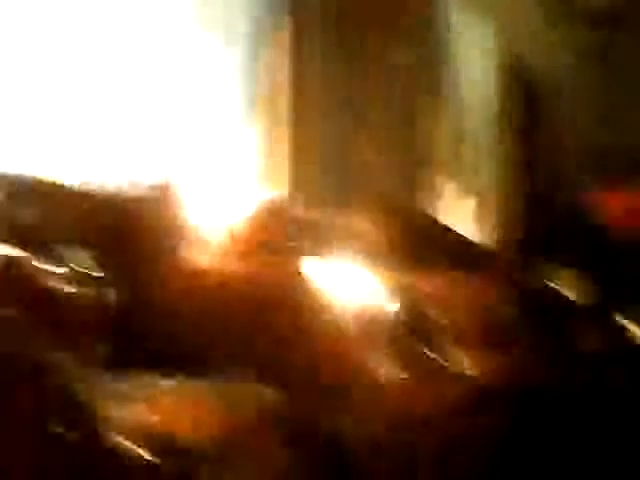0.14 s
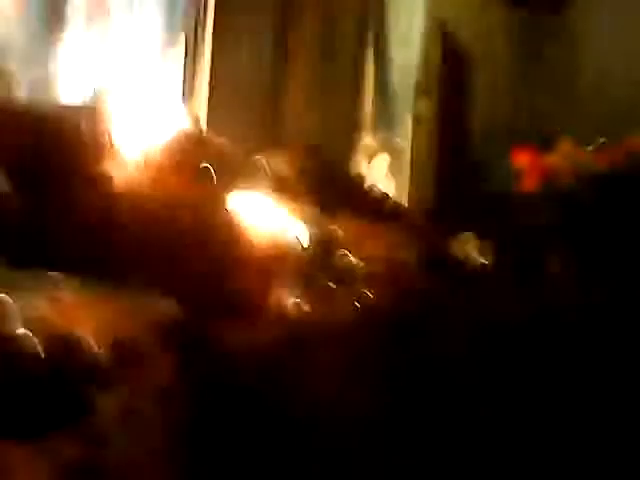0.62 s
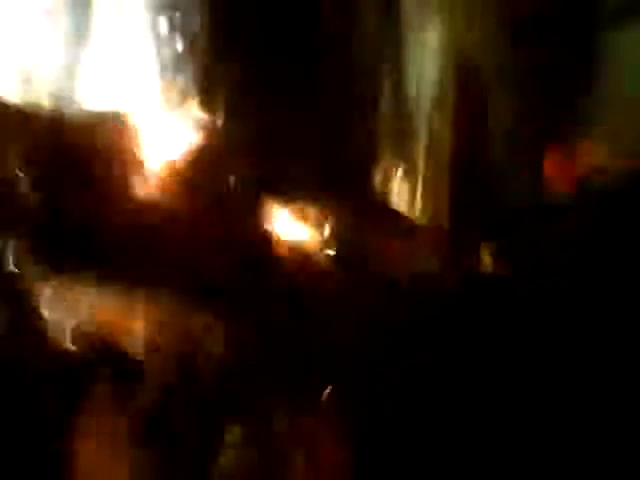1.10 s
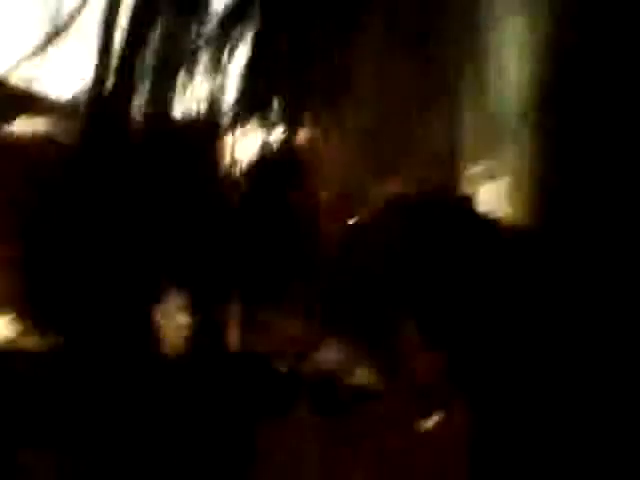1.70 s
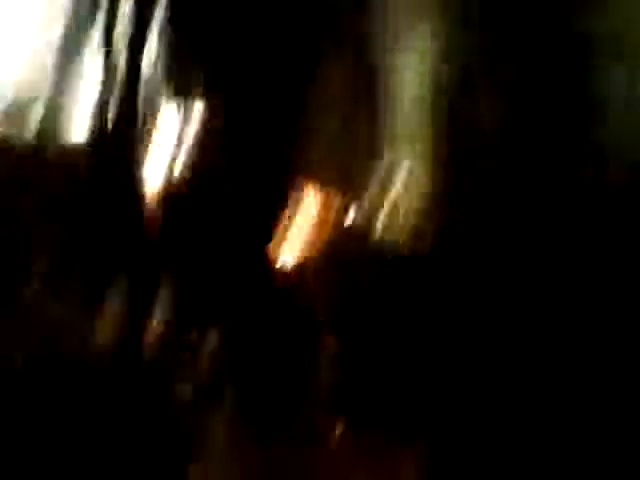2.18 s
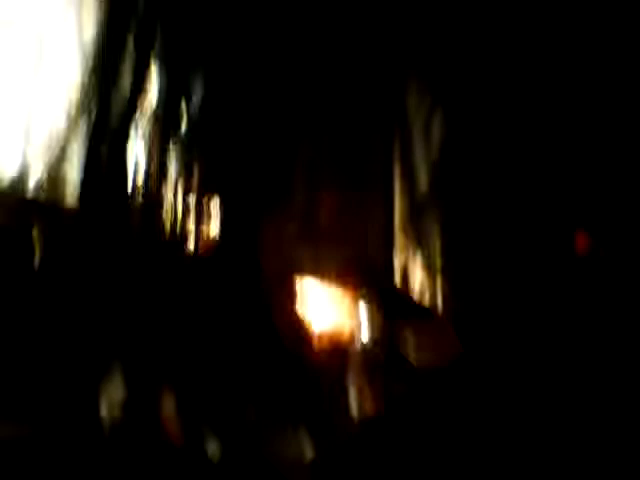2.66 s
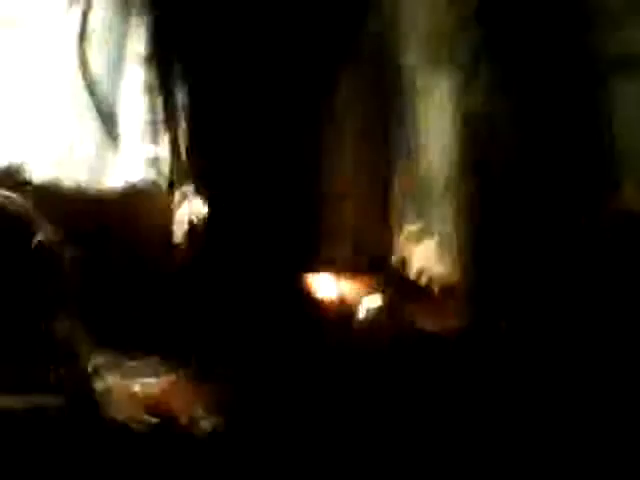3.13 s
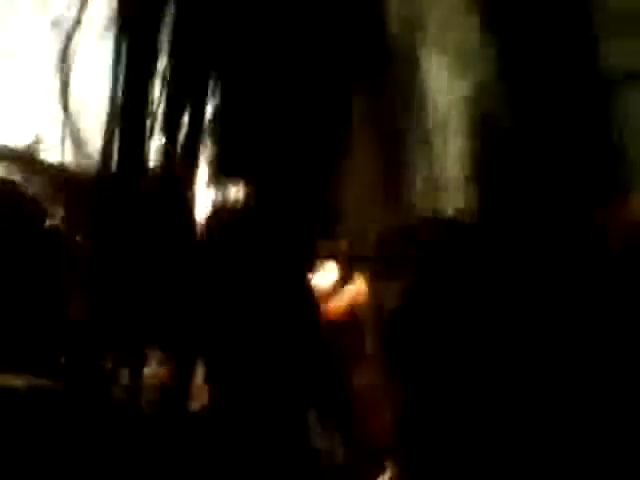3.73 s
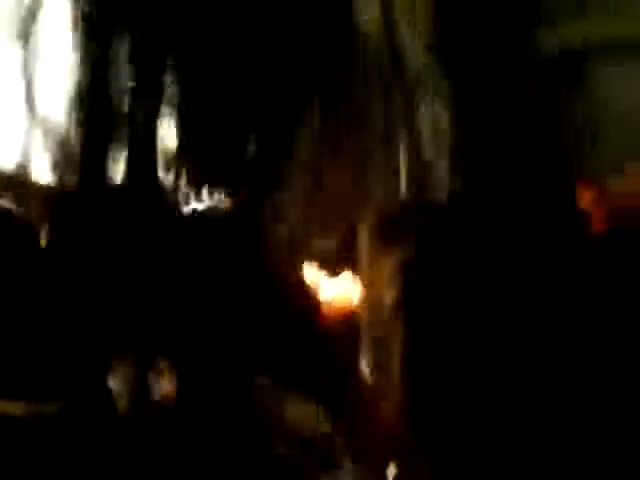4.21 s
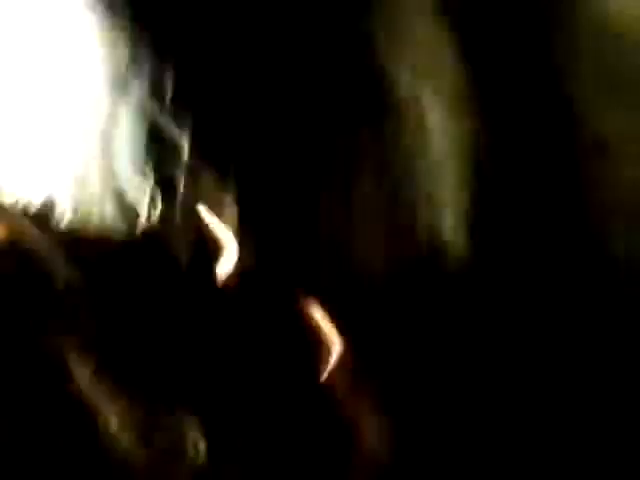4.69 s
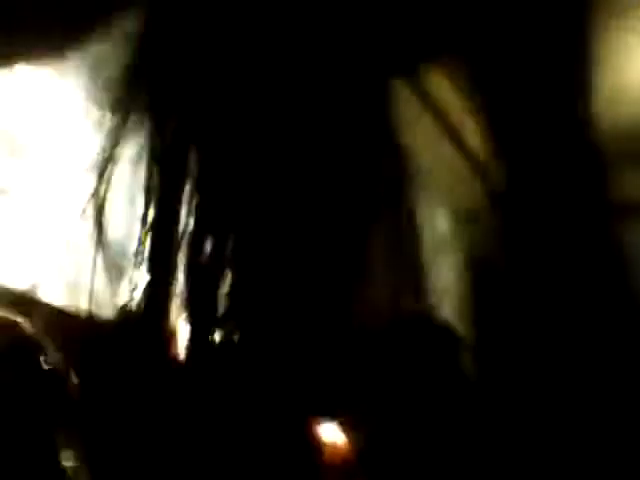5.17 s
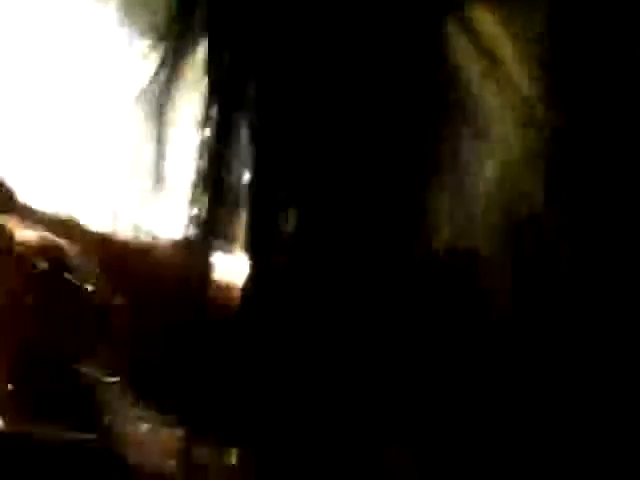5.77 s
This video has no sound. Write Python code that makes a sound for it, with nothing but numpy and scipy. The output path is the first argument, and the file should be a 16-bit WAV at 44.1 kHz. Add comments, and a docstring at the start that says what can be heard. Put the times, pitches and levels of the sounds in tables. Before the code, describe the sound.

Very close, dry, mono sound of dogs scuffling indoors, without barking or growling. Dull low thumps come in uneven clusters, with bright hard taps and brushing strokes of fur and pads. The action is busiest from about two to three and a half seconds, eases, then continues as rubbing and bumps, ending with a hard knock and thuds. Faint hiss and low handling-like rumble lie beneath.

```python
"""Two dogs wrestle right next to a small hand-held recorder indoors, for just under six seconds.
From the start, paws and bodies thud (damped low rings), claws and teeth tap (short bright rings) and
fur and pads rub (noise through resonances), over a jostling rumble (lumpy low noise) and steady hiss.
Five hollow pops (one struck cavity) come at 1.5 to 1.8 s, then a nose puffs (narrow noise) from 2.8 to
3.0 s, around the heaviest thuds; the wrestling goes on to the end."""
import sys
import numpy as np
from scipy import signal
from scipy.fft import rfft, irfft
from scipy.io import wavfile
from scipy.ndimage import uniform_filter1d

SR = 44100
rng = np.random.default_rng(int(sys.argv[2]) if len(sys.argv) > 2 else 0)


def generate_wav(sig):
    """Save sig (samples, or channels by samples) to the path in sys.argv[1] as 16-bit PCM at SR."""
    pcm = np.round(np.clip(np.atleast_2d(sig).T, -1, 1) * 32767).astype(np.int16)
    wavfile.write(sys.argv[1], SR, pcm)


def invert_db(x):
    """Field ratio 10**(x/20) for x, a level in decibels (scalar or array-like)."""
    u = np.asarray(x, float) / 20
    return 10 ** u


N = 258426  # length in samples
TIME_S = np.arange(N) / SR


def level(x, db):
    """Scale to an rms level."""
    return x * invert_db(db) / np.sqrt(np.mean(x ** 2))


def band(x, hz, width_hz):
    """Two-pole resonance, gain 1 at the centre."""
    return signal.lfilter(*signal.iirpeak(hz, hz / width_hz, fs=SR), x)


def ring(x, hz, t60_s):
    """A mode struck by x, dying away by 60 dB in t60_s."""
    pole = np.exp(2j * np.pi * hz / SR - np.log(1000) / (t60_s * SR))
    return signal.lfilter([1], [1, -pole], x).imag


def walk(rate_hz):
    """Smooth random wandering: levels held for 1 / rate_hz, then smoothed twice; spread near 0.75."""
    hold = int(SR / rate_hz)
    steps = np.repeat(rng.standard_normal(N // hold + 1), hold)
    return 1.01 * uniform_filter1d(uniform_filter1d(steps, hold), hold)[:N]


def add(out, start_s, sound, peak_db):
    """Place a sound at a start time with a given peak."""
    i = int(start_s * SR)
    out[i:i + len(sound)] += (invert_db(peak_db) * sound / np.abs(sound).max())[:N - i]


# paws and bodies landing: start_s, peak_db, pitch_hz
THUDS = [(0.024, -21.5, 214), (0.037, -17, 206), (0.137, -28, 164), (0.196, -23.5, 270), (0.212, -27, 186),
         (0.251, -32, 146), (0.309, -34, 170), (0.52, -30, 190), (0.557, -33, 146), (0.675, -32, 210),
         (0.895, -27, 147), (0.916, -25.5, 177), (0.972, -32, 121), (1.158, -24.5, 170), (1.175, -16, 192),
         (1.287, -20, 141), (1.328, -31, 146), (1.371, -22.5, 163), (1.456, -23, 255), (1.514, -32, 136),
         (1.626, -24, 162), (1.707, -31.5, 129), (1.771, -21.5, 280), (2.003, -22, 179), (2.14, -14.5, 203),
         (2.176, -20.5, 410), (2.235, -29, 210), (2.268, -21.5, 200), (2.291, -22, 205), (2.57, -31, 145),
         (2.679, -28.5, 178), (2.778, -25, 247), (2.804, -24.5, 150), (2.821, -27, 246), (2.873, -24, 158),
         (2.901, -20, 164), (2.915, -11, 215), (2.93, -18.5, 245), (2.942, -24, 291), (2.963, -26, 232),
         (2.977, -18, 346), (2.991, -11, 216), (3.276, -17, 230), (3.32, -26, 151), (3.339, -22.5, 146),
         (3.368, -12.5, 183), (3.523, -32.5, 144), (3.706, -26.5, 135), (3.811, -20.5, 138),
         (3.857, -31.5, 162), (4.016, -31, 141), (4.106, -21, 184), (4.178, -26.5, 211), (4.304, -40, 223),
         (4.411, -23.5, 218), (4.449, -27.5, 144), (4.535, -28.5, 186), (4.555, -25, 220),
         (4.576, -20.5, 179), (4.629, -28, 214), (4.736, -27.5, 117), (4.833, -29.5, 115),
         (4.964, -29.5, 156), (4.991, -28, 193), (5.05, -33.5, 121), (5.094, -31, 183), (5.153, -35, 136),
         (5.247, -28, 183), (5.658, -29.5, 195), (5.709, -39, 222), (5.733, -14.5, 140), (5.763, -26, 220),
         (5.795, -16.5, 186)]


def thuds(push_cycles=0.31, overtone_db=-12, overtone_ratio=2.1, ring_cycles=5.3):
    """A soft push, a part of a cycle long, sets off a heavily damped low ring and a weaker overtone."""
    out = np.zeros(N)
    for start_s, peak_db, pitch_hz in THUDS:
        t60_s = ring_cycles / pitch_hz
        push = np.zeros(SR // 8)
        length = max(int(push_cycles * SR / pitch_hz), 4)
        push[:length] = np.hanning(length)
        main = ring(push, pitch_hz, t60_s)
        overtone = ring(push, overtone_ratio * pitch_hz, t60_s / 2)
        add(out, start_s, main + invert_db(overtone_db) * overtone, peak_db)
    return out


# hard taps: start_s, peak_db of the middle modes, then relative to that peak:
# low_db (weight behind the tap), treble_db (hardness)
TAPS = [(0.0253, -37, 6, -20), (0.0339, -36, 11.5, -23), (0.1965, -16.5, -3.5, -38),
        (0.2132, -38.5, 2, -20), (0.521, -46.5, 2, -24), (0.9041, -30, -3.5, -31), (1.0078, -43, -25, 5.5),
        (1.1726, -37, 18.5, -19), (1.1982, -38.5, 6, -23), (1.2864, -28.5, -2, -14), (1.368, -44, 10, -11),
        (1.4427, -26, 5, -31), (1.4581, -31.5, 7.5, -37), (1.7732, -32, 9.5, -16), (1.8217, -32.5, -2, -9),
        (2.0023, -54, 14, -15), (2.0263, -37, -19, -18), (2.0585, -50, -12, 8), (2.0695, -54, -12, 7),
        (2.0925, -37.5, -3, -8), (2.1418, -30.5, 8, -34), (2.1711, -11.5, -4.5, -5.5),
        (2.2327, -42, 10, -25), (2.3078, -14, -1, -20), (2.3192, -31, -5, -4), (2.3982, -39, 10.5, -27),
        (2.4768, -39, 0, -21), (2.7392, -42, -9, 0), (2.746, -31, 3, 2), (2.7532, -22, -21, 7.5),
        (2.7773, -1, -4, 5.5), (2.8032, -38.5, -1, -19), (2.8687, -39, 4, -20), (2.9133, -36, 6, -21),
        (2.9931, -25.5, 12.5, -28), (3.279, -13.5, -3.5, 3), (3.3575, -33, 0, -8), (3.3686, -38, 11.5, -19),
        (3.5234, -45.5, 5, -19), (3.7024, -43, -12, 4.5), (3.7128, -41, 4.5, -6), (3.7526, -37.5, -16, -11),
        (3.8082, -38.5, 0, -19), (3.8552, -37.5, -7, 2.5), (4.0044, -49, -15, -15),
        (4.1063, -40.5, 15.5, -25), (4.1768, -28.5, 0, -43), (4.1822, -29.5, 2.5, -47),
        (4.3019, -46.5, 12, -31), (4.4118, -41.5, 2.5, -20), (4.4177, -35.5, 10, -33),
        (4.4308, -22, -5, -4.5), (4.5759, -25, -5, -9), (4.5963, -17, 0, -19), (4.6277, -31, -3, -22),
        (4.8094, -26.5, -16, 2.5), (4.9315, -36, 3, -31), (5.0049, -39, 9, -28), (5.0491, -53, 7, -20),
        (5.1498, -43.5, 12.5, -18), (5.4212, -39, 2, -12), (5.6131, -37.5, 5, -21),
        (5.7103, -9, -18.5, -7.5), (5.7335, -22, -1, -36), (5.7628, -40, 14, -30),
        (5.7945, -26.5, -0.5, -36)]
# what a tap rings with, in low, middle, upper middle and treble groups:
# pitch_hz (shifted a little at each tap), t60_s, strength_db (within its group)
MODES = [
    [(461, 0.05, -1.5), (585, 0.0087, 2.5), (764, 0.031, -1), (877, 0.0098, 1)],
    [(1383, 0.0086, 9), (1670, 0.0076, -4)],
    [(2170, 0.0059, -2.5), (2680, 0.0053, 3.5), (3065, 0.012, -6), (3494, 0.0043, 1)],
    [(4980, 0.0018, 13.5), (6130, 0.003, -5), (7510, 0.0018, -18.5), (9730, 0.0045, 3.5),
     (11880, 0.0088, -15.5), (14700, .003, -17)],
]
# how long the contact lasts as felt by each group, before three samples are added: push_s
GROUP_PUSHES = (0.00049, 0.00058, 0, 0)


def taps(rattle_db=-11, rattle_t60_s=0.0057):
    """A sharp contact and a short dying rattle strike the modes, a little differently at each spot."""
    out = np.zeros(N)
    t = np.arange(SR // 10) / SR
    for start_s, peak_db, low_db, treble_db in TAPS:
        upper_db = 2.5 + 0.2 * treble_db  # the upper middle rises a little with hardness
        contact = invert_db(rattle_db - 60 * t / rattle_t60_s) * rng.standard_normal(len(t))
        contact[0] += 1
        spot = 1 + 0.025 * rng.standard_normal((4, 6))  # pitch shift of each mode
        group_db = (low_db, 0, upper_db, treble_db)
        for modes, part_db, push_s, shifts in zip(MODES, group_db, GROUP_PUSHES, spot):
            push = np.convolve(contact, np.hanning(int(push_s * SR) + 3))[:len(t)]
            # all modes start the same way, which gives the sharp first spike
            sound = 0
            for (hz, t60_s, strength_db), shift in zip(modes, shifts):
                gain = invert_db(strength_db + airy(hz, treble_db))
                sound = sound + gain * ring(push, hz * shift, t60_s)
            add(out, start_s, sound, peak_db + part_db)
    return out


def airy(hz, treble_db, per_octave=0.27):
    """Tilt in dB above the lowest treble mode: soft taps lose their very top, the hardest gain there."""
    octaves_up = np.log2(hz / MODES[-1][0][0])
    return per_octave * treble_db * max(octaves_up, 0)


# resonances of the rubbed surface, three groups: pitch_hz, width_hz, strength_db (within its group)
SCRAPE_RUB = [(2430, 1580, 22.5), (2920, 340, 14), (3820, 700, -19.5)]
DULL_RUB = [(750, 370, -10), (940, 650, 8.5), (1409, 530, 5), (1720, 610, 1.5)]
BRIGHT_RUB = [(4710, 2400, -2), (5740, 600, -10.5), (8240, 1010, 3), (9490, 2400, 3), (11940, 3000, -14.5),
              (14300, 2500, -16.5)]


def rubbing():
    """Dense slips of hair and pad, uneven in size, sound through resonances whose strengths flutter."""
    slips = rng.standard_normal(N) * invert_db(1.8 * walk(900) + 1.6 * walk(150))
    out = 0
    for peaks, gain in zip((SCRAPE_RUB, DULL_RUB, BRIGHT_RUB), stroke_levels()):
        part = 0
        for hz, width_hz, strength_db in peaks:
            flutter = invert_db(strength_db + 2.6 * walk(24.89))
            part = part + flutter * band(band(slips, hz, width_hz), hz, 3 * width_hz)
        out = out + gain * level(part, 0)
    return out


# rubbing strokes: hardest_s, swell_s, ease_s, dull_db (level of the dull part at the hardest moment),
# dryness_db (scrape above the dull part)
RUBS = [(0.028, 0.008, 0.022, -51, -19), (0.1, 0.029, 0.033, -47.5, -9), (0.44, 0.057, 0.038, -50.5, -5.5),
        (0.525, 0.023, 0.063, -57, -17), (0.61, 0.072, 0.08, -49.5, -7), (0.69, 0.058, 0.06, -55.5, -10),
        (0.8, 0.11, 0.048, -61.5, -9), (0.95, 0.029, 0.037, -50, -11), (1.02, 0.072, 0.088, -51.5, -6.5),
        (1.14, 0.034, 0.035, -61, 8), (1.21, 0.069, 0.067, -49, -15), (1.29, 0.039, 0.033, -49, -3),
        (1.38, 0.073, 0.12, -46, -7), (1.46, 0.04, 0.14, -54.5, 5.5), (1.578, 0.021, 0.091, -50, -8),
        (1.73, 0.086, 0.12, -54, -2.5), (1.82, 0.023, 0.035, -48, -9), (1.87, 0.023, 0.021, -58.5, -16),
        (2.01, 0.016, 0.042, -60, -11), (2.09, 0.05, 0.033, -48.5, -8.5), (2.142, 0.011, 0.011, -44.5, -21),
        (2.2, 0.016, 0.092, -57, -6), (2.28, 0.053, 0.079, -40.5, -8.5), (2.39, 0.1, 0.071, -54, -12),
        (2.48, 0.061, 0.11, -75, 11), (2.569, 0.057, 0.066, -44, 5), (2.648, 0.057, 0.057, -44, 3),
        (2.751, 0.017, 0.02, -40, -7), (2.85, 0.041, 0.15, -52.5, -6.5), (2.95, 0.08, 0.07, -47, -12),
        (3.05, 0.072, 0.084, -72.5, 7), (3.135, 0.037, 0.035, -66, 4), (3.238, 0.042, 0.07, -56.5, -4.5),
        (3.28, 0.029, 0.011, -33, 4), (3.296, 0.018, 0.02, -44.5, -4.5), (3.37, 0.023, 0.028, -51, 1.5),
        (3.473, 0.082, 0.038, -55.5, -2.5), (3.53, 0.013, 0.013, -65, 10), (3.715, 0.037, 0.028, -55.5, 0),
        (3.76, 0.027, 0.042, -47.5, 1.5), (3.82, 0.028, 0.089, -53.5, 1), (3.87, 0.043, 0.072, -52, 2.5),
        (3.96, 0.064, 0.056, -60, 2), (4.02, 0.069, 0.057, -49.5, -0.5), (4.054, 0.032, 0.047, -50.5, -2.5),
        (4.114, 0.015, 0.077, -59.5, -15), (4.187, 0.02, 0.027, -45.5, -27),
        (4.32, 0.026, 0.058, -60.5, -10), (4.375, 0.027, 0.037, -63, 3.5), (4.451, 0.057, 0.047, -45, -5.5),
        (4.53, 0.1, 0.066, -49, -11), (4.61, 0.081, 0.12, -44, -8), (4.741, 0.067, 0.067, -43, -10),
        (4.81, 0.014, 0.048, -51.5, -14), (4.885, 0.051, 0.063, -52.5, -7), (4.973, 0.039, 0.03, -48, -3),
        (5.06, 0.015, 0.023, -51, -8.5), (5.161, 0.064, 0.064, -46, -11), (5.25, 0.085, 0.072, -44.5, -4),
        (5.34, 0.073, 0.087, -49, -8.5), (5.434, 0.029, 0.071, -40, -11.5), (5.53, 0.12, 0.067, -47, -6.5),
        (5.62, 0.076, 0.057, -45, -8.5), (5.736, 0.0067, 0.016, -37, -16), (5.768, 0.0099, 0.034, -43, -28),
        (5.799, 0.01, 0.02, -44.5, -5.5), (5.845, 0.033, 0.034, -53.5, -8)]


def stroke_levels():
    """Scrape, dull and bright gains: pressure swells and eases; the treble needs firmer pressure."""
    sharpness = np.array([1.3, 1.1, 1.6])[:, None]
    power = np.zeros((3, N))
    for hardest_s, swell_s, ease_s, dull_db, dryness_db in RUBS:
        bright_db = -8.5 + 0.86 * dryness_db  # the bright part follows the dryness
        peak_db = dull_db + np.array([dryness_db, 0, bright_db])[:, None]
        begin_s, end_s = hardest_s - swell_s, hardest_s + ease_s
        near = slice(max(int(begin_s * SR), 0), int(end_s * SR))
        angle = np.interp(TIME_S[near], [begin_s, hardest_s, end_s], [0, np.pi / 2, 0])
        # overlapping strokes add in power
        power[:, near] += (invert_db(peak_db) * np.sin(angle) ** sharpness) ** 2
    return np.sqrt(power)


def puff(start_s=2.8, end_s=3.0, pitch_hz=4350, width_hz=770):
    """A puff of air from a nose: a narrow airy hiss that grows, flutters and stops short."""
    grow = np.interp(TIME_S, [start_s, start_s + 0.04, end_s - 0.01, end_s], [0, 0.5, 0.75, 0])
    air = band(band(rng.standard_normal(N), pitch_hz, width_hz), pitch_hz, 2 * width_hz)
    return grow * invert_db(1.5 * walk(60)) * level(air, -53.5)


# a short run of small hollow pops: start_s, peak_db
POPS = [(1.547, -46), (1.597, -44), (1.658, -41.5), (1.711, -44), (1.756, -38)]


def pops(pitch_hz=1120, t60_s=0.033):
    """One small cavity, softly struck."""
    out = np.zeros(N)
    push = np.pad(np.hanning(SR // 2000), (0, SR // 20))
    for start_s, peak_db in POPS:
        add(out, start_s, ring(push, pitch_hz, t60_s), peak_db)
    return out


# how hard the two wrestle, joined by straight lines: time_s, body_db (rumble without rubbing drag)
EFFORT = [(0.0, -50.5), (0.78, -54), (1.52, -44), (1.94, -52), (2.07, -51), (2.24, -38), (2.63, -49.5),
          (2.82, -43), (2.97, -50.5), (3.49, -60.5), (3.75, -64.5), (3.97, -53.5), (4.11, -60), (4.34, -49),
          (4.6, -47), (5.61, -51), (5.73, -57), (5.86, -56)]


def jostle(lumpy_db=6.5):
    """Small unseen bumps run together into a lumpy rumble and a hollow knocking, over a low sway."""
    effort_s, effort_db = np.transpose(EFFORT)
    effort = invert_db(np.interp(TIME_S, effort_s, effort_db))
    drag = stroke_levels()[1]  # a rubbing stroke also drags the body
    # the lowest ring never quite dies, and its pitch wavers
    sway = np.sin(2 * np.pi * np.cumsum(54 + 7 * walk(30)) / SR)
    low = sway + level(band(band(rng.standard_normal(N), 40, 50), 34, 62), -0.5)
    bumps = rng.standard_normal(N) * invert_db(lumpy_db * walk(60))
    body = band(band(bumps, 152.7, 78), 140, 170) + invert_db(-10) * band(band(bumps, 240, 150), 290, 430)
    knock = band(band(bumps, 396, 170), 440, 350) + invert_db(-5) * band(band(bumps, 602, 150), 820, 370)
    low_gain = invert_db(-57.5) + lurch_level()  # sway at rest, plus the lurches
    body_gain = np.hypot(effort, invert_db(-1.5) * drag)
    knock_gain = np.hypot(invert_db(-12.5) * effort, invert_db(-6) * drag)
    return low_gain * level(low, 0) + body_gain * level(body, 0) + knock_gain * level(knock, 0)


# heavy lurches that set the lowest ring swaying: peak_s, peak_db (each lurch alone)
LURCHES = [(.02, -49), (.45, -36.5), (.66, -41.5), (.96, -43), (1.04, -41), (1.28, -45), (1.35, -35.5),
           (1.45, -41), (1.71, -43), (2.01, -53), (2.28, -36), (2.6, -46), (2.79, -38.5), (2.9, -34),
           (3.0, -41), (3.121, -36.5), (3.36, -35), (3.22, -46), (3.52, -46), (3.64, -46), (3.72, -41),
           (3.82, -47), (3.9, -45), (4.13, -44.5), (4.42, -51), (4.58, -39), (4.75, -41), (4.99, -46),
           (5.27, -50), (5.42, -45), (5.72, -44), (5.81, -46)]


def lurch_level(rise_db_s=351.5, fall_db_s=302):
    """Each lurch climbs to its peak and falls away at a steady rate in dB per second."""
    out = np.zeros(N)
    for peak_s, peak_db in LURCHES:
        after_s = TIME_S - peak_s
        below_db = np.where(after_s < 0, -rise_db_s * after_s, fall_db_s * after_s)
        out += invert_db(peak_db - below_db)
    return out


# colour of the background hiss: pitch_hz, density_db (relative, per Hz)
HISS = [(120, -52), (200, -1.5), (347, -22.5), (424, -18.5), (601, -14.5), (2960, -21), (8270, -33.5),
        (13100, -30), (16000, -48.5)]


def hiss():
    """Steady background of room and microphone: noise shaped over frequency."""
    hz, density_db = np.transpose(HISS)
    f = np.fft.rfftfreq(N, 1 / SR) + 1  # 1 Hz up, to keep the logarithm finite
    colour = invert_db(np.interp(np.log(f), np.log(hz), density_db))
    return level(irfft(rfft(rng.standard_normal(N)) * colour, N), -66)


def scene():
    """All sources lie close to the microphone, so the room adds nothing to hear."""
    # thuds and taps carry little below 82 Hz
    blows = signal.lfilter(*signal.butter(2, 82, "high", fs=SR), thuds() + taps())
    return (blows + rubbing() + puff() + pops() + jostle() + hiss())[None]


def band_limit(x):
    """A steep low-pass at the top of the band."""
    return signal.sosfilt(signal.butter(12, 16800, fs=SR, output="sos"), x)


def record(dry, clip=0.7, knee=4, top_hz=16100, offset=0.0033):
    """The recorder thins the deepest bass, rounds the loudest cracks, cuts the top and sits off zero."""
    thinned = signal.lfilter(*signal.butter(2, 38, "high", fs=SR), dry)
    rounded = thinned / (1 + (thinned / clip) ** knee) ** (1 / knee)
    top_cut = signal.ellip(8, 0.2, 70, top_hz, fs=SR, output="sos")
    finished = signal.sosfilt(top_cut, rounded) + offset
    return band_limit(finished)


dry = scene()
out = record(dry)
generate_wav(out)
```